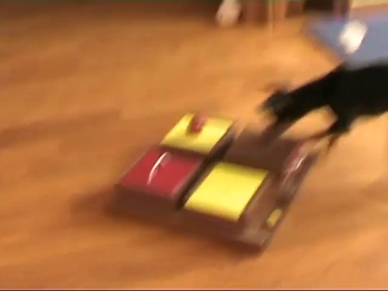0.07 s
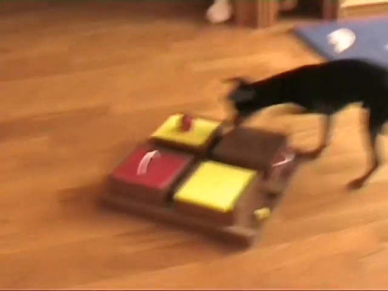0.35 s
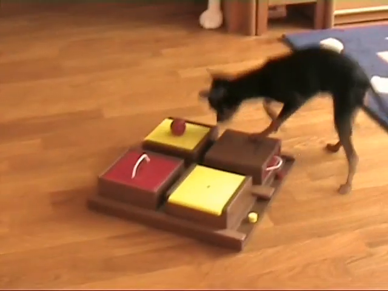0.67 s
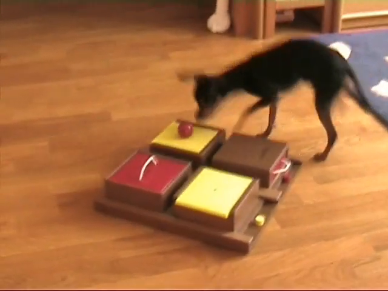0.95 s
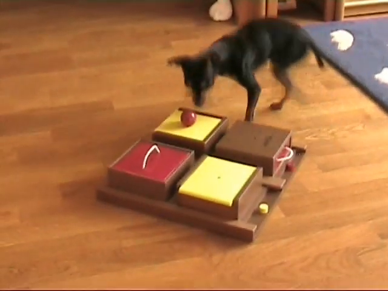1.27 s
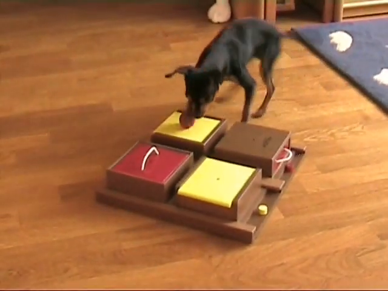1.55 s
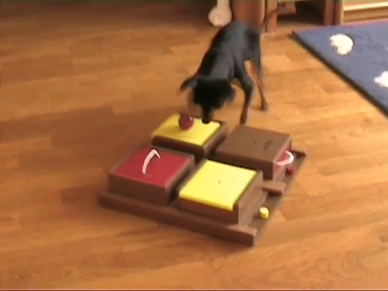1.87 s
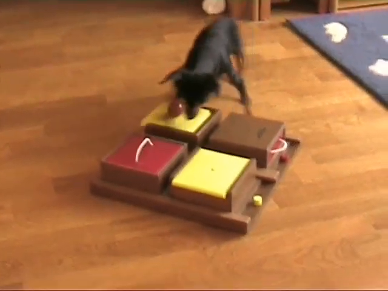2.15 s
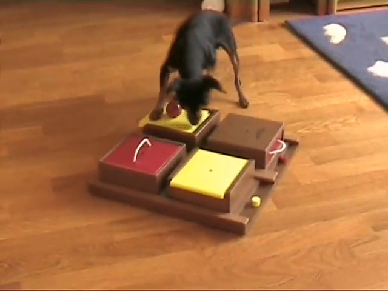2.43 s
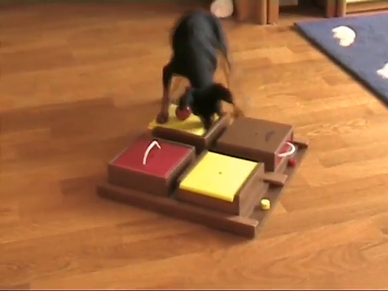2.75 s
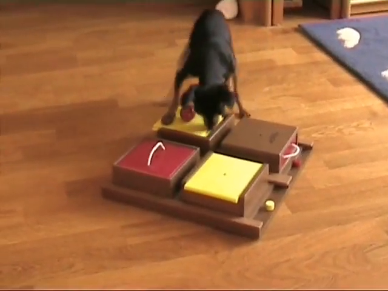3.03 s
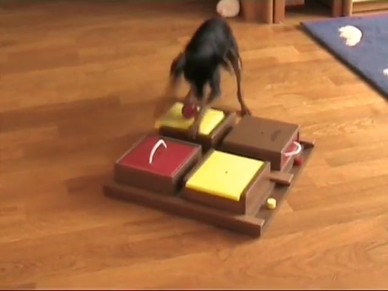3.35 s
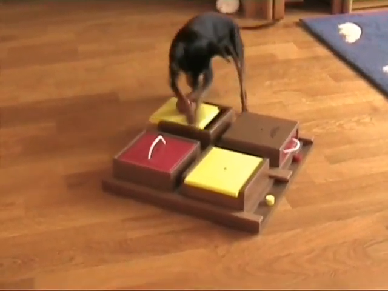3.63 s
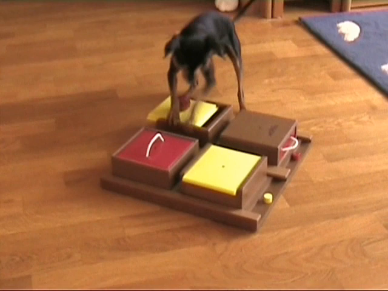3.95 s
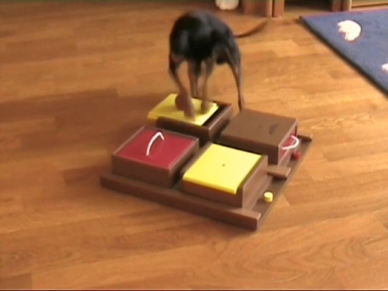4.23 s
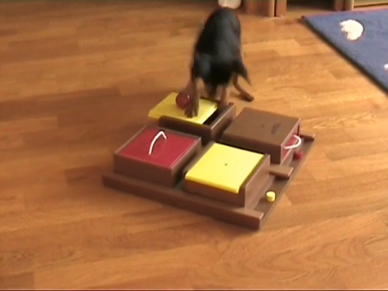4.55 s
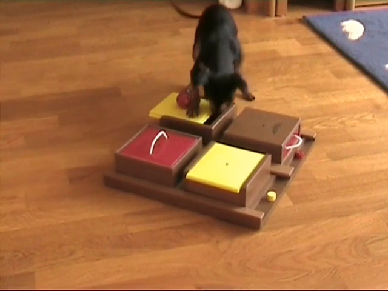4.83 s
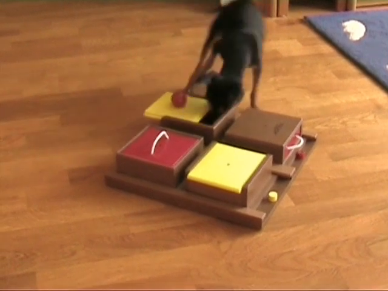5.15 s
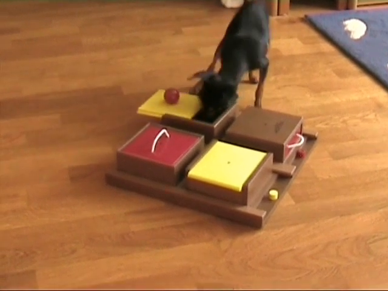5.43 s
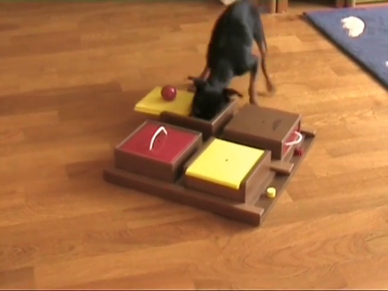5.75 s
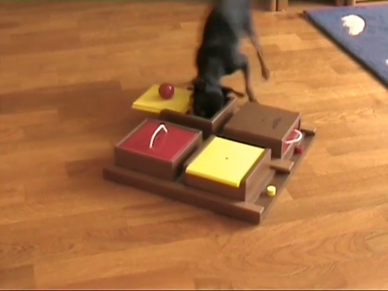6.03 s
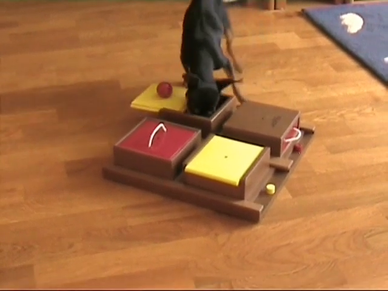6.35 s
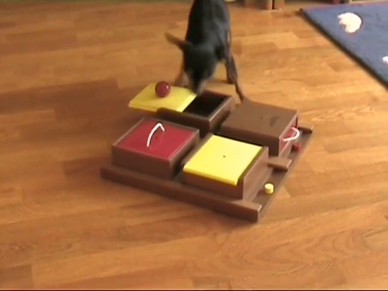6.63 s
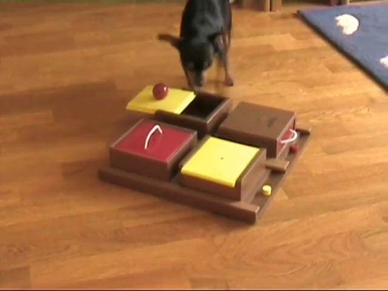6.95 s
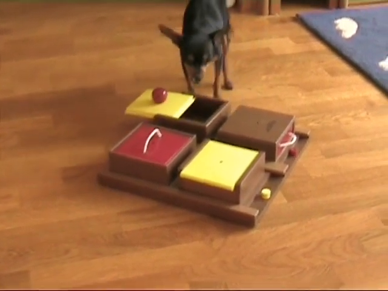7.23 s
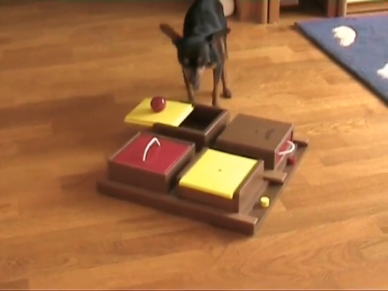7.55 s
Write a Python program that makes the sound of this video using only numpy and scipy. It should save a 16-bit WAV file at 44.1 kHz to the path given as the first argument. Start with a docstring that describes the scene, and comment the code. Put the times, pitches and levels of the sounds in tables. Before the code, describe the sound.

Light claw taps, scattered wooden knocks and a scraping lid give way to a dog's soft crunching, with a few close plastic ticks.

```python
"""Soft scuffs and claw taps on parquet, over the hiss, whine and hum of a hand-held camera two metres off.
A small dog is working a wooden puzzle box: it knocks and scrapes the sliding lid open, and from six
seconds on crunches the dry treat inside. Each contact rings wood or jaw, and the room answers briefly.
Right at the stereo microphone, the camera's plastic case ticks in the hand, close and dry."""
import sys
import numpy as np
from scipy import signal
from scipy.fft import rfft, irfft, next_fast_len
from scipy.io import wavfile
from scipy.ndimage import uniform_filter1d

SR = 44100
rng = np.random.default_rng(int(sys.argv[2]) if len(sys.argv) > 2 else 0)


def master_out(mix):
    """Clip the mix to full scale and print it as 16-bit PCM to the path in sys.argv[1]."""
    frames = np.transpose(np.atleast_2d(mix))
    ceiling = np.clip(frames, -1, 1)
    pcm = np.round(ceiling * 32767).astype(np.int16)
    wavfile.write(sys.argv[1], SR, pcm)


N = 339129
LEAD_S = .005  # silence before each contact, which leaves room for its filter

# The bands in which contacts on wood are voiced. Each entry: a band edge in Hz.
WOOD_BANDS_HZ = [130, 450, 1150, 2500, 4500, 7000, 13000]


def amp(db):
    """Decibels to gain."""
    return 10 ** (np.asarray(db) / 20)


def unit(x):
    """Scales to an energy of one."""
    return x / np.sqrt(np.sum(x ** 2) + 1e-20)


def read(points, hz):
    """Reads a spectrum table on a log-frequency axis."""
    freqs, values = np.transpose(points)
    return np.interp(np.log(hz + 1), np.log(freqs), values)


def seconds(length):
    """A time axis."""
    return np.arange(int(length * SR)) / SR


def colour(x, points):
    """Filters by rows of frequency in Hz and gain in dB."""
    size = next_fast_len(x.shape[-1] + 512)
    gain = amp(read(points, np.fft.rfftfreq(size, 1 / SR)))
    return irfft(rfft(x, size) * gain, size)[..., :x.shape[-1]]


def add(mix, start_s, pair):
    """Mixes in a mid and side pair."""
    part = mix[:, max(round(start_s * SR), 0):][:, :pair.shape[1]]
    part += pair[:, :part.shape[1]]


def ring(modes, tick_db, spread_s):
    """An object's answer to a tap: a bare tick and dying modes, delayed by spread_s at 1 kHz."""
    t = seconds(1 / 4)
    tap = sum(amp(db) * unit(amp(-60 * t / t60) * np.cos(2 * np.pi * hz * t)) for hz, db, t60 in modes)
    tap[0] += amp(tick_db)
    # low bending waves run slower, which spreads the blow
    lag = 4 * np.pi * spread_s * np.sqrt(1000 * np.fft.rfftfreq(len(t), 1 / SR))
    tap = irfft(rfft(tap) * np.exp(-1j * lag), len(t))
    return signal.lfilter(*signal.butter(4, 165, "high", fs=SR), tap)  # small things radiate little bass


def room(wet_db, early_db=-1, early_s=0.016, build_s=0.0044):
    """From one spot on the floor to the microphone: direct sound, first reflections and a tail."""
    # The room's decay. Each row: frequency in Hz, time to fall 60 dB in seconds.
    decay = [(150, 0.67), (660, 0.35), (1740, 0.43), (4600, 0.34), (9000, 0.29), (14000, 0.18)]
    # The width of its echoes. Each row: frequency in Hz, side gain in dB.
    width = [(100, 12), (200, -20), (370, -8), (700, -18), (1300, -12.5), (2300, -14.5), (4200, -15),
             (7800, -1), (13000, 3.5)]
    t = seconds(1 / 2)
    mid_noise, side_noise, early_noise = rng.standard_normal((3, len(t)))
    arrivals = rng.random(len(t)) < 900 / SR
    onset = 1 - np.exp(-(t / build_s) ** 2)
    early_fade = np.exp(-t / early_s)
    reflections = unit(early_noise * arrivals * onset * early_fade)
    hz, frame_s, spectra = signal.stft(np.array([mid_noise, side_noise]), SR, nperseg=256)
    spectra *= amp(-60 * frame_s / read(decay, hz)[:, None])
    mid_tail, side_tail = signal.istft(spectra, SR, nperseg=256)[1][:, :len(t)] * onset
    mid = amp(wet_db) * (unit(mid_tail) + amp(early_db) * reflections)
    side = np.linalg.norm(mid) * colour(unit(side_tail * (1 + early_fade)), width)
    mid[0] += 1  # direct sound
    return np.array([mid, side])


def excite(force, body, note_hz, lift_db, wet_db):
    """A force rings the body, one note above the others, and the room answers."""
    sound = signal.fftconvolve(force, body)
    note = signal.lfilter(*signal.iirpeak(note_hz, Q=13, fs=SR), sound)
    sound += (amp(lift_db) - 1) * note
    return signal.fftconvolve(sound[None], room(wet_db), axes=1)


def band_levels(edges, tone, level_db, weight_db, contact_s, note_hz, lift_db):
    """Weight brings bass, a long contact dulls the treble, and energy gathers round the note."""
    hz = np.sqrt(np.multiply(edges[:-1], edges[1:]))
    bass_db = weight_db / (1 + (hz / 1310) ** 5)
    dull_db = 10 * np.log10(1 + (hz * contact_s) ** 7.4)
    note_db = 0.55 * lift_db * np.exp(-(np.log2(hz / note_hz) / 0.48) ** 2)
    return level_db + read(tone, hz) + bass_db - dull_db + note_db


def voice(pair, edges, levels_db, start_s, length_s, size=16384):
    """Gives a contact its own hardness: filters it towards the band levels over the given stretch."""
    part = pair[0, int(start_s * SR):][:int(length_s * SR)]
    hz = np.fft.rfftfreq(size, 1 / SR)
    power = 2 * abs(rfft(part, size)) ** 2 / (size * len(part))
    gains = [(np.sqrt(lo * hi), db - 10 * np.log10(power[(hz > lo) & (hz < hi)].sum() + 1e-20))
             for db, lo, hi in zip(levels_db, edges, edges[1:])]
    return colour(np.pad(pair, ((0, 0), (round(LEAD_S * SR), 0))), gains)


def grit(size, per_s, spread_db):
    """Tiny slips of uneven size."""
    slips = (rng.random(size) < per_s / SR) * rng.choice([-1, 1], size)
    return slips * amp(spread_db * np.minimum(rng.exponential(1, size), 4))


def blows(rows, edges, tone, body, wet_db, chatter_db, crush_s, lift_db):
    """Each blow is a short rough contact and a dying chatter of smaller ones."""
    out, t = np.zeros((2, N)), seconds(1 / 8)
    for start_s, level_db, weight_db, contact_s, chatter_s, note_hz in rows:
        contact = unit(rng.standard_normal(len(t)) * (t + crush_s / 10) * np.exp(-t / crush_s))
        chatter = grit(len(t), per_s=3700, spread_db=3) * np.exp(-t / chatter_s)
        heard = excite(contact + amp(chatter_db) * chatter, body, note_hz, lift_db, wet_db)
        levels_db = band_levels(edges, tone, level_db, weight_db, contact_s, note_hz, lift_db)
        add(out, start_s - LEAD_S, voice(heard, edges, levels_db, start_s=0, length_s=.022))
    return out


def camera_hiss(level_db=-65.5):
    """The camera's own steady noise floor."""
    # The hiss spectrum. Each row: frequency in Hz, relative level in dB.
    tone = [(20, 10.5), (60, -18), (110, -13.5), (150, -25), (190, -14.5), (300, -9.5), (500, -2),
            (800, 0.5), (1100, -3), (1600, -6), (3000, -7.5), (6300, -8), (7300, -20.5), (14000, -23)]
    # Its width. Each row: frequency in Hz, side gain in dB.
    width = [(60, -50), (110, 14.5), (170, 11), (370, 0.5), (680, 1.5), (1250, -2), (2300, -5),
             (4230, -7.5), (7760, -2), (14000, 8.5)]
    mid, side = colour(rng.standard_normal((2, N)), tone)
    return amp(level_db) * np.array([mid, colour(side, width)]) / mid.std()


def motor_whine(waver_hz=4, swell_db=2):
    """Faint, slightly unsteady tones, likely the camera's motor; waver_hz holds at 4 kHz."""
    # The tones. Each row: frequency in Hz, rms level in dB, side relative to mid in dB.
    tones = [(814, -76.5, 0.5), (1928, -80, -41), (4048, -75, -28), (4940, -96, -9), (4980, -80.5, -25),
             (5450, -80, -36), (6450, -84, -31)]
    out = np.zeros((2, N))
    for hz, db, side_db in tones:
        drift = uniform_filter1d(rng.standard_normal(N), size=2000)
        turns = np.cumsum(hz + waver_hz * np.sqrt(hz / 4000) * drift / drift.std()) / SR
        swell = np.interp(np.arange(N), np.linspace(0, N, 400), rng.standard_normal(400))
        peaks = np.sqrt(2) * amp([[db], [db + side_db]])
        out += peaks * amp(swell_db * swell) * np.sin(2 * np.pi * turns)
    return out


def motor_hum(hz=150, mid_db=-88, side_db=-80, flutter=.3):
    """The motor shakes the case, pushing the two microphone ports against each other."""
    shake = signal.lfilter(*signal.butter(2, 12, fs=SR), rng.standard_normal((2, N)))
    swell = 1 + flutter * shake / shake.std()
    phase = 2 * np.pi * hz * np.arange(N) / SR + [[0], [np.pi / 2]]
    return np.sqrt(2) * amp([[mid_db], [side_db]]) * swell * np.sin(phase)


def scrapes_and_lid_ring():
    """Scrapes and rubs on the lid, and the lid's low ring after two knocks: swells of dense slips ring its
    wood."""
    # Scrapes, and the low ring at 1.636, 1.665 and 2.105 s. Each row: peak, rise and fall in seconds,
    # level and weight in dB, contact of one slip in seconds, note in Hz, note lift in dB.
    swells = [(.06, 0.093, 0.27, -66.5, 2.5, 0.00011, 980, 6),
              (.29, .05, .035, -74.5, 10, .0001, 1030, 14.5),
              (.55, 0.031, 0.13, -68.5, -1.5, 0.00014, 533, 15),
              (1.636, .003, 0.0074, -43, -3, 0.00046, 536, 13),
              (1.665, 0.016, 0.047, -76, 17, 0.00016, 528, 26),
              (2.085, .026, 0.066, -53.5, -12, .00015, 2960, 10),
              (2.105, .012, .022, -62, 11, 0.0002, 519, 27),
              (2.165, 0.032, 0.063, -56.5, -6, 0.00011, 1445, 15.5),
              (3.29, 0.047, 0.056, -73, 7, 0.00014, 1710, 6.5),
              (3.83, 0.029, 0.025, -58.5, -3, 0.00012, 1520, 14.5),
              (3.92, 0.039, 0.038, -61.5, -7, 0.00018, 1510, 20),
              (4.11, 0.045, 0.24, -56, -14, 0.00015, 1510, 8.5),
              (4.285, 0.024, 0.049, -61.5, 0, .00006, 760, 15),
              (4.43, 0.019, 0.063, -68, 7, 0.00034, 717, 15),
              (4.595, 0.016, 0.017, -54.5, -8.5, 0.000058, 733, 16.5),
              (4.695, .0094, 0.0053, -74, 9, .00005, 5300, 26),
              (4.82, 0.021, 0.0074, -63, 1, 0.00006, 5000, 9),
              (5.056, 0.019, 0.0049, -64, 5.5, 0.00036, 692, 24),
              (5.415, 0.017, 0.0043, -58.5, 11, 0.00019, 1630, 7),
              (5.85, 0.019, .032, -63.5, 4, 0.00019, 1640, 7),
              (5.9, .02, 0.05, -67.5, 3.5, .00014, 1490, 9.5), (6.3, 0.044, 0.04, -59, -9, 0.0006, 620, 17)]
    # The lid's modes. Each row: frequency in Hz, level in dB, time to fall 60 dB in seconds.
    modes = [(499, -1.5, 0.069), (726, 5.5, 0.021), (797, -3, 0.19), (1394, 3.5, 0.016), (1670, 8, 0.011),
             (3200, 8.5, 0.02), (5200, -45, 0.035)]
    # The hardest scrape's colour. Each row: frequency in Hz, band level offset in dB.
    tone = [(240, -21.5), (720, -4), (1700, 0), (3350, 0), (5600, 2), (9500, -8)]
    lid = ring(modes, tick_db=22, spread_s=0.00194)
    out = np.zeros((2, N))
    for peak_s, rise_s, fall_s, level_db, weight_db, contact_s, note_hz, lift_db in swells:
        run_up_s = min(2.5 * rise_s, peak_s)
        t = seconds(1 / 3) - run_up_s
        swell = np.exp(-(t / np.where(t < 0, rise_s, fall_s)) ** 2 / 2)
        slips = swell * grit(len(t), per_s=6200, spread_db=2)
        heard = excite(slips, lid, note_hz, lift_db, wet_db=-1.5)
        levels_db = band_levels(WOOD_BANDS_HZ, tone, level_db, weight_db, contact_s, note_hz, lift_db)
        voiced = voice(heard, WOOD_BANDS_HZ, levels_db, run_up_s / 2, run_up_s / 2 + fall_s)
        add(out, peak_s - run_up_s - LEAD_S, voiced)
    return out


def claw_taps():
    """Claws land on the parquet, which rings short and bright."""
    # The taps. Each row: start in seconds, level and weight in dB, contact and chatter in seconds,
    # note in Hz.
    taps = [(.142, -50, -13, 0.00021, 0.0073, 2510), (.16, -56, -9, 0.00019, 0.0086, 4100),
            (.215, -62, 0.5, 0.00015, 0.012, 2700), (.375, -65.5, -4, 0.00016, 0.0059, 2860),
            (.502, -62, 2.5, 0.00019, 0.0065, 1050), (.689, -60.5, 3.5, 0.00013, .002, 3970),
            (.893, -61, -3, 0.0002, 0.0088, 1600), (.942, -59.5, -10, 0.00011, .0077, 5400),
            (1.8105, -58.5, -16, 0.000072, 0.00052, 5100), (1.822, -53.5, -14, 0.00022, .007, 3120),
            (2.778, -58.5, -15, 0.00012, 0.0073, 1630), (2.812, -57.5, -13, 0.00016, .016, 1660)]
    # The parquet's modes. Each row: frequency in Hz, level in dB, time to fall 60 dB in seconds.
    modes = [(635, -8, 0.0045), (1690, 4, 0.011), (2930, 9, 0.04), (4820, -9, 0.045), (7040, 17, 0.013)]
    # The hardest tap's colour. Each row: frequency in Hz, band level offset in dB.
    tone = [(240, -14.5), (720, -2.5), (1700, -3), (3350, 1), (5600, 1), (9500, -1)]
    parquet = ring(modes, tick_db=37, spread_s=0.000793)
    return blows(taps, WOOD_BANDS_HZ, tone, parquet,
                 wet_db=-0.5, chatter_db=-8.5, crush_s=0.0008, lift_db=9.5)


def case_ticks(edge_boost_db=4, bounce_s=0.0061, bounce_db=-11, side_db=-14):
    """Handling ticks reach the microphone through the camera's plastic, each with one small bounce."""
    # The ticks. Each row: start in seconds, level in dB, noisy edge against the ring in dB before boost.
    ticks = [(0.174, -32, -31), (2.46, -33.5, -19.5), (2.919, -51, -24), (2.986, -32.5, -12.5),
             (3.116, -48, -24), (3.136, -47, -22), (3.181, -44, -22), (5.43, -28.5, -11),
             (5.502, -43.5, -24), (5.754, -48.5, -8), (6.703, -36.5, -28), (6.76, -42, -31),
             (6.797, -47.5, -21), (6.832, -44, -28), (6.846, -45, -28)]
    # The case's modes. Each row: frequency in Hz, relative level in dB, time to fall 60 dB in seconds.
    modes = [(550, -63, 0.0043), (794, 41, 0.025), (1051, 32, 0.056), (1560, 27.5, 0.025)]
    out, t = np.zeros((2, N)), seconds(1 / 20)
    edge_band = signal.butter(2, [1200, 6500], "band", fs=SR)
    for start_s, level_db, edge_db in ticks:
        plastic = sum(amp(db - 60 * t / t60) * np.sin(2 * np.pi * hz * rng.normal(1, .035) * t)
                      for hz, db, t60 in modes)
        edge = signal.lfilter(*edge_band, rng.standard_normal(len(t))) * np.exp(-t / 0.0032)
        tick = plastic / abs(plastic).max() + amp(edge_db + edge_boost_db) * edge
        pair = amp(level_db) * np.array([tick, amp(side_db) * tick])
        add(out, start_s, pair)
        add(out, start_s + bounce_s * rng.normal(1, 0.11), amp(bounce_db) * pair)
    return signal.lfilter(*signal.butter(3, 430, "high", fs=SR), out)


def box_knocks():
    """Paws and nose strike the lid and the wooden box; the spot struck picks a note."""
    # The knocks. Each row: start in seconds, level and weight in dB, contact and chatter in seconds,
    # note in Hz.
    knocks = [(1.63, -44, -10, 0.00046, 0.0019, 1370), (1.633, -49, 7, 0.0002, 0.0022, 532),
              (2.107, -44.5, -19, .00016, 0.0081, 4600), (2.238, -44, -7.5, 0.00014, 0.0047, 1160),
              (3.393, -58, -6, 0.0002, 0.041, 5740), (3.448, -26.5, -2.5, .00032, 0.0039, 1107),
              (3.535, -51, 5, .00006, .0056, 5400), (3.556, -37.5, -2, 0.00012, .013, 732),
              (3.58, -35, -7, 0.00047, 0.0024, 1080), (3.654, -47.5, 1, 0.000089, 0.0078, 713),
              (3.894, -54, -5, 0.00021, 0.0036, 1660), (4.005, -39.5, -9.5, 0.00012, .012, 1464),
              (4.167, -43, -6, 0.000064, 0.015, 5470), (4.214, -41.5, 0.5, 0.00011, 0.0049, 780),
              (4.245, -52, 0, 0.00007, 0.0068, 700), (4.545, -55.5, -1, .00006, 0.0073, 720),
              (4.566, -48.5, -3.5, 0.000054, 0.004, 750), (4.833, -57.5, -25, 0.000041, 0.0025, 5200),
              (5.059, -61.5, 9, 0.0003, 0.0028, 690), (5.428, -49.5, -6.5, 0.00061, 0.0019, 1500),
              (6.196, -61, -5, 0.0002, .008, 1520), (6.26, -57, -6, 0.00023, 0.0059, 1450)]
    # The box's modes. Each row: frequency in Hz, level in dB, time to fall 60 dB in seconds.
    modes = [(162, -2, .2), (235, -8, .13), (380, -8, .1), (535, 0, .14), (638, 5, .14), (712, 5, .22),
             (805, 3, .18), (982, 1, .12), (1122, -5, .1), (1400, -1, .09), (1752, 2, .12), (1900, -3, .08),
             (2172, -3, .07), (3200, -5, .06), (5340, -5, .06)]
    # The hardest knock's colour. Each row: frequency in Hz, band level offset in dB.
    tone = [(240, -25), (720, -0.5), (1700, 0), (3350, -0.5), (5600, 2.5), (9500, -7.5)]
    box = ring(modes, tick_db=26.5, spread_s=0.001933)
    return blows(knocks, WOOD_BANDS_HZ, tone, box, wet_db=0, chatter_db=-15, crush_s=0.00063, lift_db=8.5)


def treat_crunches():
    """Teeth pick up and crack the dry treat, ringing the jaw as it crumbles."""
    # The bites. Each row: start in seconds, level and weight in dB, contact and crumbling in seconds,
    # note in Hz.
    bites = [(6.014, -55.5, -7, 0.0002, .0006, 3210), (6.039, -54.5, -3, 0.000052, 0.0024, 4150),
             (6.688, -49, -32, 0.0003, 0.0017, 2230), (6.87, -66.5, -9, 0.00026, .0008, 2730),
             (6.91, -62, -10, 0.00027, 0.0013, 2680), (6.948, -56, -16, 0.00029, .0062, 2110),
             (6.986, -66.5, 1, .00015, .001, 2060), (7.033, -47.5, 2.5, 0.00014, 0.0027, 1780),
             (7.071, -51, -6, .00017, 0.009, 1720), (7.206, -55.5, -18, 0.0002, 0.02, 2320),
             (7.262, -61.5, 5, 0.0003, 0.00064, 2280), (7.35, -58, -5, 0.00032, 0.0013, 2130),
             (7.443, -64, -7, 0.00019, .0014, 2200), (7.606, -59, 7.5, 0.00013, 0.0017, 2090),
             (7.625, -69.5, 18, 0.00011, 0.0024, 4440)]
    # The jaw's modes. Each row: frequency in Hz, level in dB, time to fall 60 dB in seconds.
    modes = [(2196, -23, 0.06), (2880, -8.5, 0.034), (3690, -23, 0.015), (4660, 8, 0.016),
             (7230, 24, 0.0037)]
    # The hardest bite's colour. Each row: frequency in Hz, band level offset in dB.
    tone = [(230, -29), (775, -10.5), (2000, -5.5), (3500, 0), (5600, 2), (9500, -5.5)]
    # The bands of a crunch. Each entry: a band edge in Hz.
    edges = [130, 400, 1500, 2700, 4500, 7000, 13000]
    jaw = ring(modes, tick_db=32, spread_s=0.000932)
    return blows(bites, edges, tone, jaw, wet_db=-3, chatter_db=-14.5, crush_s=0.0023, lift_db=14)


def scene():
    """The dog two metres away and the camera close by, as mid and side, then left and right."""
    dog = box_knocks() + claw_taps() + treat_crunches() + scrapes_and_lid_ring()
    camera = case_ticks() + camera_hiss() + motor_whine() + motor_hum()
    mid, side = dog + camera
    return np.array([mid + side, mid - side])


def record(dry):
    """The small microphone loses the deep bass and the top treble, with a steep cut at 14.6 kHz."""
    heard = colour(dry, [(30, -10), (90, 0), (10500, 0), (12000, -10), (14500, -25)])
    band_limit = signal.firwin(255, 14600, window=("kaiser", 9), fs=SR)
    return signal.oaconvolve(heard, band_limit[None], "same")


dry = scene()
out = record(dry)
master_out(out)
```